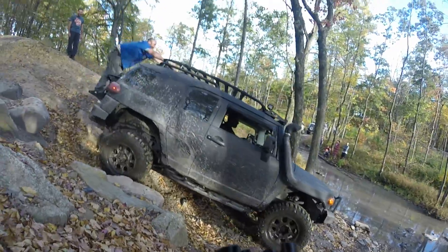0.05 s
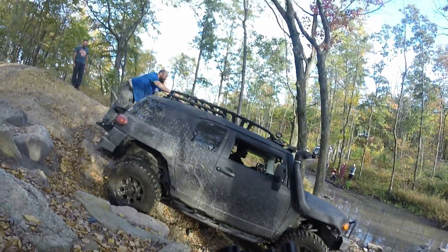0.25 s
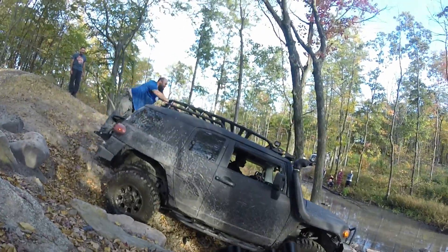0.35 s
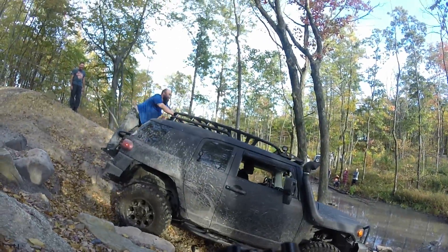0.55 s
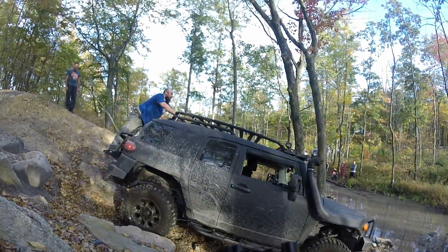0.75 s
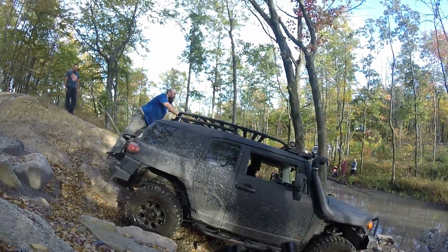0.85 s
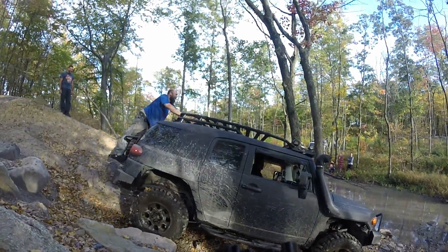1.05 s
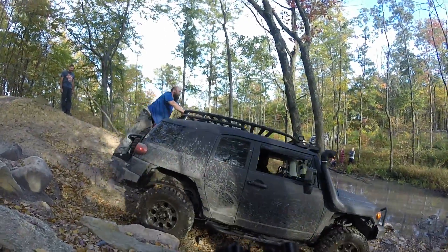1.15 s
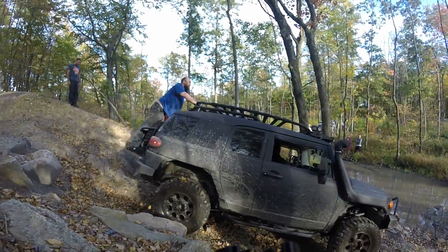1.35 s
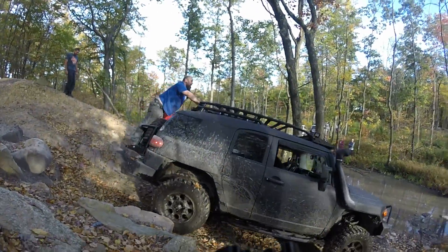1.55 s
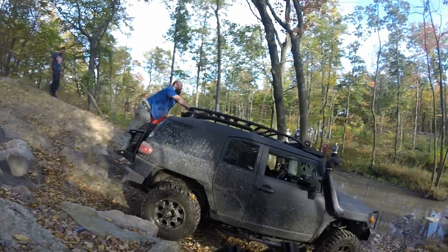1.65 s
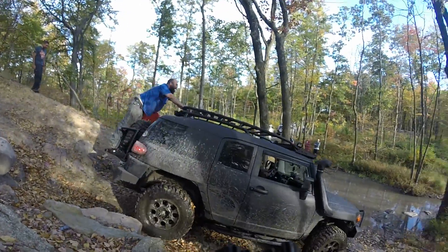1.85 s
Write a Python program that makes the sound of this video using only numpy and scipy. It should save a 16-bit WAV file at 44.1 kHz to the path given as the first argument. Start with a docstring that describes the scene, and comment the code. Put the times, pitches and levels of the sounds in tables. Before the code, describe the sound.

A vehicle crawling down rocks gives a faint, uneven low rumble with slight whirr throughout. Close to the encased microphone, small bumps and grit ticks lead to a hollow thump at 0.25 s, then a very loud, dry knock at 0.41 s with short ringing and faint rebounds. The sound ducks and recovers; dull stones knock near 0.9 s. Scratchy cloth rubs and clicks come from 1.4 to 1.8 s.

```python
"""Rocky descent in a plastic case

An off-road vehicle creeps down a rocky slope: shaped noise gives its low uneven rumble and faint whirr.
Close sounds dominate inside a closed plastic case: bumps excite its low resonances, impulses click in its
mount and tick as grit, and friction noise brushes it as cloth. One sharp knock adds a crack, an echo and
decaying modes. A gain control ducks after loud peaks and recovers."""
import sys
import numpy as np
from scipy import signal
from scipy.fft import rfft, irfft, next_fast_len
from scipy.io import wavfile
from scipy.ndimage import map_coordinates

SR = 44100
rng = np.random.default_rng(int(sys.argv[2]) if len(sys.argv) > 2 else 0)


def generate_wav(sig):
    """Save sig (samples, or channels by samples) to the path in sys.argv[1] as 16-bit PCM at SR."""
    pcm = np.round(np.clip(np.atleast_2d(sig).T, -1, 1) * 32767).astype(np.int16)
    wavfile.write(sys.argv[1], SR, pcm)


N = 83790
T = np.arange(N) / SR  # time in seconds


def amp(db):
    """Amplitude ratio of a level in decibels, by the logarithmic definition of level."""
    return 10 ** (np.asarray(db) / 20)


def unit(x):
    """Normalisation to unit root-mean-square amplitude."""
    return x / np.sqrt(np.mean(x ** 2) + 1e-20)


def along(points, hz):
    """Interpolation of (frequency in Hz, value) points on a logarithmic frequency axis."""
    f, v = np.transpose(points)
    return np.interp(np.log(hz + 1), np.log(f + 1), v)


def wobble(rate):
    """Smooth random modulation: a spline through random knots, rate knots a second."""
    return map_coordinates(rng.standard_normal(256), [T * rate], mode="wrap")


def filtered(x, response):
    """Linear filtering: the spectrum of x is multiplied by a complex frequency response."""
    size = next_fast_len(N + SR // 2)
    spectrum = rfft(x, size) * response(np.fft.rfftfreq(size, 1 / SR))
    return irfft(spectrum, size)[:N]


def coloured(x, colour):
    """Spectral shaping: x is filtered to a given colour and brought to unit rms."""
    return unit(filtered(x, lambda hz: amp(along(colour, hz))))


def snap(colour, size=4096):
    """Minimum-phase impulse of peak 1: folding the cepstrum makes a given spectrum causal."""
    cepstrum = irfft(np.log(amp(along(colour, np.fft.rfftfreq(size, 1 / SR)))))
    cepstrum[1:size // 2] *= 2
    cepstrum[size // 2 + 1:] = 0
    click = irfft(np.exp(rfft(cepstrum)))
    return click / np.abs(click).max()


def at(s, sound):
    """Time shift: a sound is delayed to start at s seconds."""
    return np.pad(sound, (round(s * SR), N))[:N]


def vehicle():
    """Broadband noise of slowly varying level: low rumble through the case, faint whirr and rustle."""
    # Course of the rumble. Each row: time in seconds, level in dB before the lift below.
    rumble_course = [(0.0, -48), (0.264, -47.5), (0.46, -49.5), (0.682, -56.5), (0.798, -50), (1.206, -53),
                     (1.396, -48), (1.512, -56.5), (1.63, -54), (1.9, -51)]
    # Spectrum of the rumble. Each row: frequency in Hz, relative level in dB.
    rumble_colour = [(12, 1.5), (30, 2), (60, -3.5), (130, -10.5), (180, -13), (220, -7), (275, -18.5),
                     (400, -27.5), (900, -56.5)]
    # Spectrum of engine whirr and tyres in leaves. Each row: frequency in Hz, relative level in dB.
    air_colour = [(180, -36), (300, -4.5), (404, -3), (517, -6.5), (985, -9), (1090, -9.5), (1620, -5),
                  (2040, -11.5), (3510, -13.5), (4280, -20), (5850, -20.5), (13600, -36), (15500, -54)]
    lift_db, rumble_swing_db = 2.5, 1.5
    air_db, air_swing_db = -58, 2
    level_db = np.interp(T, *np.transpose(rumble_course)) + lift_db + rumble_swing_db * wobble(24.9)
    rumble = amp(level_db) * coloured(rng.standard_normal(N), rumble_colour)
    air_gain = amp(air_db + air_swing_db * wobble(18))
    return rumble + air_gain * coloured(rng.standard_normal(N), air_colour)


def boom(s, db, contact_s):
    """Forced resonance: a Gaussian push of 1/e half-width contact_s excites the case's low modes."""
    # Low resonances of the case. Each row: centre in Hz, bandwidth in Hz, relative level in dB.
    case_modes = [(49, 65, -9), (178, 88, -2.5), (220.1, 18.6, 7.5)]
    push = np.exp(-((T - s) / contact_s) ** 2)

    def response(f):
        return sum(amp(g) * 1j * f * w / (c * c - f * f + 1j * f * w) for c, w, g in case_modes)

    ring = filtered(push, response)
    return amp(db) * ring / np.abs(ring).max()


def case_bumps():
    """Soft impacts: the longer the contact, the less high-frequency force reaches the case."""
    # Bumps on the case. Each row: time in seconds, peak level in dB, contact time in seconds.
    bump_rows = [(.022, -39.5, 0.0013), (.075, -39.5, 0.0019), (0.1402, -26.5, 0.0018),
                 (0.2237, -36, 0.0015), (0.2497, -14, 0.0017), (.2765, -25, 0.0019), (.358, -38, 0.0041),
                 (0.414, -32.5, 0.00077), (.4255, -30.5, .0009), (.49, -38, 0.0018), (.697, -34, 0.003),
                 (.888, -43, 0.0021), (1.012, -43.5, 0.00092), (1.253, -40.5, 0.0046), (1.304, -43, 0.0011),
                 (1.357, -37.5, 0.0017), (1.73, -41.5, 0.0012), (1.856, -34.5, 0.0017),
                 (1.879, -37.5, 0.0014)]
    return sum(boom(*row) for row in bump_rows)


def grit_ticks():
    """Brief hard contacts: each grain of grit gives a bright broadband impulse."""
    # Ticks of grit. Each row: time in seconds, peak level in dB.
    tick_rows = [(.119, -40), (.1562, -36.5), (.1635, -27.5), (.165, -37.5), (1.629, -33), (1.643, -37),
                 (1.653, -40), (1.683, -46), (1.695, -42)]
    # Spectrum of a tick. Each row: frequency in Hz, relative level in dB.
    grit_colour = [(200, -25), (1200, -8), (1800, -3.5), (3000, 2.5), (4300, -12.5), (10000, -19),
                   (15500, -24.5)]
    tick = snap(grit_colour)
    return sum(amp(db) * at(s, tick) for s, db in tick_rows)


def mount_clicks():
    """Stick-slip release: each slip of the mount snaps and pushes the case into a low boom."""
    # Slips. Each row: time in seconds, peak level of the snap in dB, peak level of the boom in dB.
    click_rows = [(0.218, -39.5, -53), (0.6974, -38, -45.5), (1.4, -26.5, -38.5), (1.5951, -28.5, -37.5),
                  (1.8071, -27, -35.5)]
    # Spectrum of the snap. Each row: frequency in Hz, relative level in dB.
    slip_colour = [(100, -7), (550, -14), (1100, -1.5), (1500, -1), (1780, 7), (2100, -10.5), (2600, -10),
                   (3600, -28.5), (15000, -49)]
    contact_s = 0.0011
    slip = snap(slip_colour)
    snaps = sum(amp(db) * at(s, slip) for s, db, _ in click_rows)
    booms = sum(boom(s + contact_s, boom_db, contact_s) for s, _, boom_db in click_rows)
    return snaps + booms


def stroke(start, rise, hold, release, db):
    """Stroke envelope: the level swells, holds and fades linearly in decibels."""
    range_db = 20.5  # change of level over the rise and over the release
    before = np.maximum((start + rise - T) / rise, 0)
    after = np.maximum((T - start - rise - hold) / release, 0)
    return amp(db - range_db * (before + after))


def scratchy(colour):
    """Friction noise of unit rms: sparse random catches are added to a continuous hiss."""
    grains_per_s, grain_share = 2200, 0.4  # the share is of power
    catches = unit((rng.random(N) < grains_per_s / SR) * rng.standard_normal(N))
    hiss = rng.standard_normal(N)
    return coloured(np.sqrt(grain_share) * catches + np.sqrt(1 - grain_share) * hiss, colour)


def cloth():
    """Sliding friction: cloth rubs the case in strokes, short gritty scuffs and a smoother swish."""
    # Rubs. Each row: start, rise, hold and release in seconds, level in dB before the pressure wobble.
    rub_rows = [(0.24, 0.057, 0.011, 0.12, -50.5), (1.382, 0.1, 0.041, 0.14, -43.5),
                (1.523, 0.073, .03, 0.054, -46), (1.21, .22, 0.33, 0.124, -58.5)]
    # Spectrum of the rubs. Each row: frequency in Hz, relative level in dB.
    cloth_colour = [(500, -14), (1150, -13), (1450, -5), (1830, -1), (2150, -14.5), (2550, -10), (2900, -3),
                    (3350, 0.5), (3700, -3), (4100, -16), (5600, -8), (6500, -15.5), (7400, -11.5),
                    (8400, -17.5), (9400, -12), (12000, -23.5), (15500, -25.5)]
    # Scuffs. Each row: start in seconds, initial level in dB, time to decay by 60 dB in seconds.
    scuff_rows = [(0.2472, -38, 0.074), (.273, -40.5, 0.098), (.879, -50.5, 0.16)]
    # Spectrum of the scuffs. Each row: frequency in Hz, relative level in dB.
    scuff_colour = [(200, 3.5), (420, -1), (800, 0.5), (1300, -2), (1900, -2.5), (3000, -7), (4500, -20),
                    (15000, -34)]
    # One lighter stroke: start, rise, hold and release in seconds.
    swish_times = (.46, .16, .11, .17)
    # Spectrum of the lighter stroke. Each row: frequency in Hz, relative level in dB.
    swish_colour = [(500, -25), (1900, -9), (2700, 3), (3700, -1), (4400, -10), (6200, -7), (8200, -4),
                    (11000, -14), (12500, -29.5), (16000, -34)]
    swish_db = -56
    pressure = np.sqrt(sum(stroke(*row) ** 2 for row in rub_rows))  # overlapping strokes add in power
    pressure = pressure * amp(1.63 * wobble(90))
    scuff_gain = sum(at(s, amp(db - 60 * T / t60)) for s, db, t60 in scuff_rows)
    swish = stroke(*swish_times, swish_db) * coloured(rng.standard_normal(N), swish_colour)
    return pressure * scratchy(cloth_colour) + scuff_gain * scratchy(scuff_colour) + swish


def stones():
    """Dull impacts: stones shifting under the tyres give impulses with weak treble."""
    # Knocks of stones. Each row: time in seconds, peak level in dB.
    stone_rows = [(.2728, -34), (.881, -43), (.9183, -38.5)]
    # Spectrum of a knock. Each row: frequency in Hz, relative level in dB.
    stone_colour = [(100, -17), (300, -9), (420, 3), (560, -2.5), (1300, -2), (1900, -8), (2500, -19),
                    (15000, -50)]
    thud = snap(stone_colour)
    return sum(amp(db) * at(s, thud) for s, db in stone_rows)


def knock():
    """Impact and modal decay: a crack, its echo, a brief rattle, ringing modes and two rebounds."""
    # Spectrum of the crack. Each row: frequency in Hz, relative level in dB.
    crack_colour = [(60, -33), (450, -22), (900, -11), (1650, 0), (2800, 2), (3350, -24), (4500, -25.5),
                    (7800, -26.5), (11000, -37.5), (16000, -57)]
    # Modes of the case. Each row: frequency in Hz, level in dB before the blow's gain,
    # time to decay by 60 dB in seconds.
    ring_modes = [(189, -41, 0.045), (276, -38.5, 0.17), (348.4, -35.5, 0.154), (653, -47, .05),
                  (759, -31, .055), (1006, -39, .04), (1192, -27, 0.056), (1318, -23, 0.056),
                  (1743, -17.5, .022), (2400, -21.5, 0.03), (3540, -32, 0.015)]
    # Faint taps after the knock. Each row: time in seconds, peak level in dB.
    rebound_rows = [(.473, -35), (.495, -37.5)]
    knock_s, knock_db = 0.4097, 1.5
    echo_s, echo_db = 0.00134, -13  # return from the far wall of the case, relative to the crack
    rattle_db, rattle_t60_s = -33, 0.033  # level before the blow's gain
    crack = snap(crack_colour)
    echo = amp(echo_db) * at(echo_s, crack)
    ring = sum(amp(db - 60 * T / t60) * np.sin(2 * np.pi * hz * T) for hz, db, t60 in ring_modes)
    rattle = amp(rattle_db - 60 * T / rattle_t60_s) * coloured(rng.standard_normal(N), crack_colour)
    blow = at(0, crack) + echo + ring + rattle
    rebounds = sum(amp(db) * at(s, crack) for s, db in rebound_rows)
    return amp(knock_db) * at(knock_s, blow) + rebounds


def scene():
    """Superposition: the pressures of all sources add."""
    close_sounds = case_bumps() + grit_ticks() + mount_clicks() + cloth() + knock()
    return (vehicle() + stones() + close_sounds)[None]


def record(dry):
    """Dynamic compression: loud peaks lower the gain, which recovers; then clipping and a treble cut."""
    limit_db, duck_share = -17.5, 0.37  # the share is dB of ducking per dB above the limit
    attack_s, recover_s = 0.0099, 0.23  # time constants
    clip_top = 0.95
    top_hz, edge_hz = 15950, 600  # the response falls to zero at the top, over the width of the edge
    x = dry[0]
    over_db = np.maximum(20 * np.log10(np.abs(x) + 1e-9) - limit_db, 0)
    fade = np.exp(-T / recover_s)
    held_db = np.maximum.accumulate(over_db / fade) * fade  # peak hold with exponential recovery
    attack = np.exp(-1 / (attack_s * SR))
    duck_db = duck_share * signal.lfilter([1 - attack], [1, -attack], held_db)
    clipped = np.clip(x * amp(-duck_db), -clip_top, clip_top)
    return filtered(clipped, lambda hz: np.clip((top_hz - hz) / edge_hz, 0, 1))[None]


dry = scene()
out = record(dry)
generate_wav(out)
```